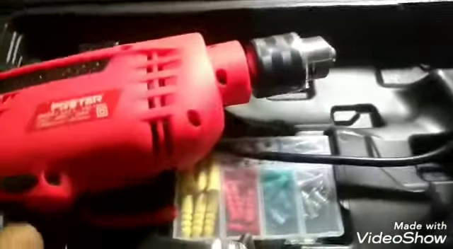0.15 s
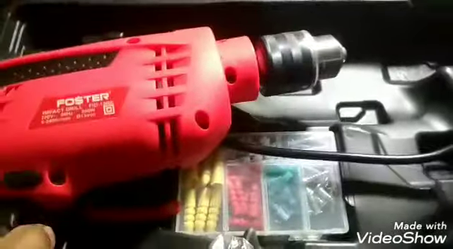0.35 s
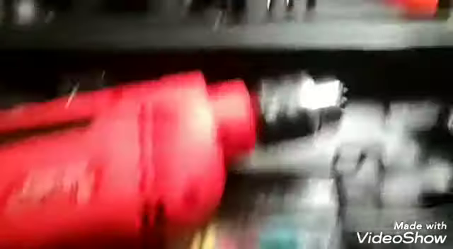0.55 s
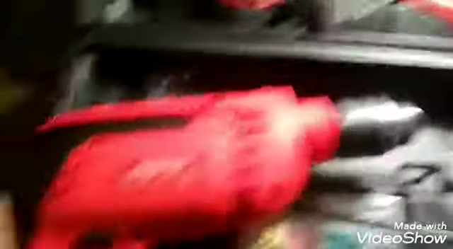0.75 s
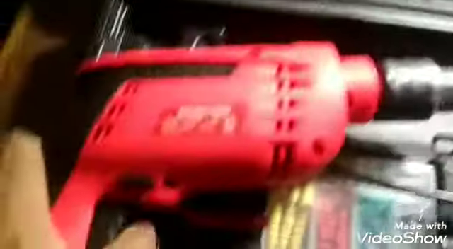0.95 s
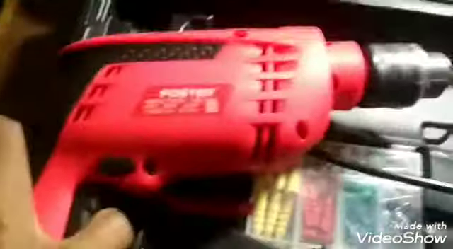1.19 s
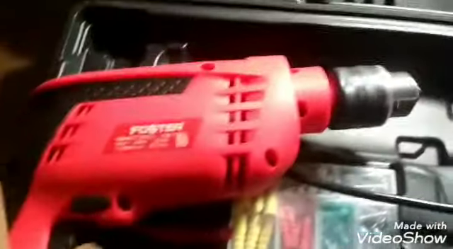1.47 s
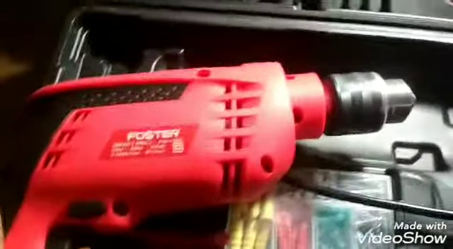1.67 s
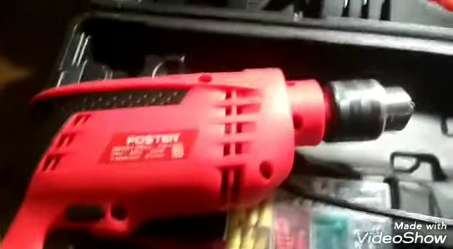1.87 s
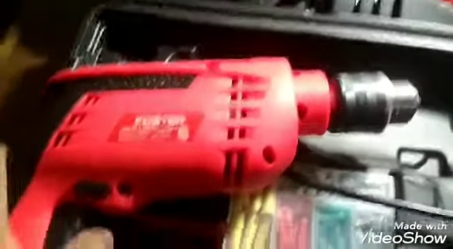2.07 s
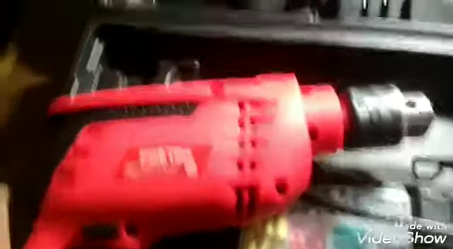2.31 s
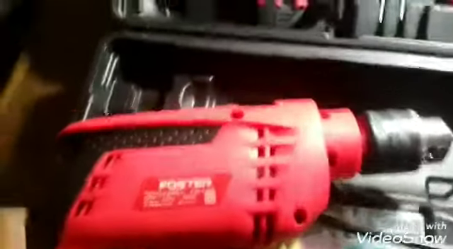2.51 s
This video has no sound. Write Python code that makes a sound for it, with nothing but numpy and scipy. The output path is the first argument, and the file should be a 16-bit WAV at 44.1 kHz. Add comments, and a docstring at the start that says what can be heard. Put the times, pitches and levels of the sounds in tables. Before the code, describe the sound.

Electric drill spun freely in short bursts, whining, rattling and winding down to a stop, close up

```python
"""Close to a phone, on its two microphones: a mains drill with no load, triggered four times in short pulls.
It coasts down between them. Brushes whine on the commutator bars as multiples of the bar rate, the fan hisses
as coloured noise, and loose gears rattle the plastic case as random taps and knocks through resonances.
While current flows the motor hums and growls at twice the mains rate; the case roars at top speed and groans
at the end. Switch ticks and grip creaks come before the start; a faint noise floor lies behind."""
import sys
import numpy as np
from scipy import signal
from scipy.fft import rfft, irfft
from scipy.io import wavfile
from scipy.ndimage import uniform_filter1d

SR = 44100
rng = np.random.default_rng(int(sys.argv[2]) if len(sys.argv) > 2 else 0)


def attenuation_scalar(level_db):
    """Turn a level in dB into a linear amplitude multiplier (20 dB per decade)."""
    decades = np.asarray(level_db, float) / 20
    return 10 ** decades


def pcm_store(signal):
    """Save signal as 16-bit PCM."""
    levels = np.round(np.clip(np.atleast_2d(signal), -1, 1) * 32767)
    wavfile.write(sys.argv[1], SR, levels.astype(np.int16).T)


N = 116865
t = np.arange(N) / SR


def evened(x):
    """Scales x to rms 1."""
    return x / np.sqrt(np.mean(x ** 2) + 1e-20)


def noise():
    """White noise for the whole scene."""
    return rng.standard_normal(N)


def curve(table, col=1):
    """Joins one column over time by straight lines; -120 before the first row."""
    rows = np.array(table)
    return np.interp(t, rows[:, 0], rows[:, col], left=-120)


def read(points, hz):
    """Reads a table of values on a logarithmic frequency axis."""
    f, value = np.transpose(points)
    return np.interp(np.log(hz + 1), np.log(f + 1), value)


def colour(x, points):
    """Filters x by a spectrum in dB."""
    return irfft(rfft(x) * attenuation_scalar(read(points, np.fft.rfftfreq(N, 1 / SR))), N)


def drift(hz):
    """Random wander of rms 1, low-passed at hz."""
    return evened(signal.sosfilt(signal.butter(2, hz, fs=SR, output="sos"), noise()))


def resonate(x, hz, width):
    """A resonance of gain 1 that follows the curve hz."""
    turn = np.exp(2j * np.pi * np.cumsum(hz * np.ones(N)) / SR)
    r = np.exp(-np.pi * width / SR)
    return 2 * (turn * signal.lfilter([1 - r], [1, -r], x / turn)).real


def band(x, lo_hz, hi_hz):
    """Keeps one band of x."""
    return signal.sosfilt(signal.butter(3, [lo_hz, hi_hz], "bandpass", fs=SR, output="sos"), x)


def clicks(rows):
    """Single-sample impulses from rows of time and level."""
    out = np.zeros(N)
    for s, db in rows:
        out[round(s * SR)] += attenuation_scalar(db)
    return out


# Trigger pulls: on [t/s], off [t/s], hum [level/dB], growl [level/dB]
PULLS = [(0.223, 0.415, -47, -34.5), (1.194, 1.335, -44.5, -35), (1.538, 1.649, -45.5, -35),
         (1.784, 1.899, -43, -30.5)]
PULL_RISE_S, HUM_FALL_S, GROWL_FALL_S = 0.028, 0.021, 0.012


def power(col, fall_s):
    """Gain that rises as current comes on at each pull and dies exponentially after release."""
    gain = np.zeros(N)
    for pull in PULLS:
        rise = np.clip((t - pull[0]) / PULL_RISE_S, 0, 1)
        fall = np.exp(-np.maximum(t - pull[1], 0) / fall_s)
        gain = gain + attenuation_scalar(pull[col]) * rise * fall
    return gain


# Commutator bars passing a brush: [t/s], bar rate [f/Hz]
BAR_RATE = [(.24, 1500), (.28, 3500), (.3, 4350), (.33, 5100), (.365, 5650), (.42, 5800), (.45, 5550),
            (.55, 4690), (.7, 3470), (.85, 2460), (.95, 1860), (1.05, 1340), (1.14, 930), (1.2, 729),
            (1.24, 1290), (1.29, 2050), (1.33, 2240), (1.4, 1900), (1.5, 1400), (1.55, 1240), (1.63, 2060),
            (1.665, 2210), (1.76, 1670), (1.795, 1530), (1.85, 2800), (1.9, 3320), (2.1, 2030), (2.2, 1510),
            (2.3, 1030), (2.4, 640), (2.56, 100)]
# Whine partials: [multiple of the bar rate], relative level before colouring [level/dB]
WHINE = [(1, -5), (2, -13), (3, -4), (4, -4), (5, -7), (6, -9), (7, -11), (8, -14)]
# Vents pass the whine unevenly: [f/Hz], gain [level/dB]
VENTS = [(2200, -25), (3700, -2), (5600, 0), (6600, -7), (8500, -4), (10500, 1.5), (16000, -1)]
WHINE_WIDTH_HZ, WHINE_CLEAN, WHINE_FLICKER_DB = 240, .58, 2  # width of the fuzz, share of clean tone
FIRST_FROM_HZ = 2600  # the lowest multiple fades in above this bar rate
UNDER_POWER_DB = -3.5  # sparking brushes bury the whine while current flows
MESH, MESH_DB, FULL_TORQUE_HZ_PER_S = .535, 0, 16000  # gear tone as a multiple of the bar rate


def whine():
    """Brushes sing slightly fuzzy multiples of the bar rate; a lower gear tone sings while speeding up."""
    hz = uniform_filter1d(curve(BAR_RATE), size=1300)
    on = power(2, HUM_FALL_S)
    on = np.minimum(3 * on / on.max(), 1)

    def tone(k):
        """One flickering multiple, faded out toward 17 kHz."""
        clean = np.sqrt(2) * np.sin(2 * np.pi * (k * np.cumsum(hz) / SR + rng.random()))
        fuzz = evened(resonate(noise(), k * hz, WHINE_WIDTH_HZ))
        blend = WHINE_CLEAN * clean + (1 - WHINE_CLEAN) * fuzz
        return np.clip((17000 - k * hz) / 900, 0, 1) * attenuation_scalar(WHINE_FLICKER_DB * drift(15.5)) * blend

    bars = np.zeros(N)
    for k, db in WHINE:
        fade = np.clip((hz - FIRST_FROM_HZ) / 1400, 0, 1) if k == 1 else 1
        bars = bars + attenuation_scalar(db) * tone(k) * fade
    bars = colour(bars, VENTS) * attenuation_scalar(UNDER_POWER_DB * on)
    speeding_up = uniform_filter1d(np.gradient(hz) * SR, size=900)
    torque = np.clip(speeding_up / FULL_TORQUE_HZ_PER_S, 0, 1)
    mesh = attenuation_scalar(MESH_DB) * torque * np.clip((hz - 3000) / 900, 0, 1) * tone(MESH)
    return bars + mesh


# Drill layers: [t/s], hiss [level/dB], top of the hiss against it [level/dB],
# gear rattle and case drone, both before their trims in gears() [level/dB]
LEVELS = [(0.18, -61, 9, -64, -83), (0.208, -59, -12, -75, -67), (0.22, -43.5, 4, -61, -55),
          (0.24, -41, 6, -40, -48), (0.31, -38.5, 4.5, -28, -43), (0.42, -36, 0.5, -34, -61),
          (0.94, -40, 0.5, -36.5, -43), (0.97, -39.5, -2, -58, -44), (1.0, -42.5, 0.5, -31.5, -38.5),
          (1.08, -44.5, 5, -37, -45.5), (1.14, -43.5, 7.5, -41.5, -37), (1.19, -46.5, -1.5, -43.5, -49),
          (1.22, -40.5, -0.5, -37.5, -35.5), (1.27, -37.5, -0.5, -37, -61), (1.32, -37.5, -1, -32.5, -40.5),
          (1.34, -39, 0, -38, -46.5), (1.55, -42, 1.5, -35, -40), (1.59, -37, -4.5, -42, -32.5),
          (1.63, -36, -1, -34.5, -50), (1.7, -41.5, 2, -39, -39), (1.86, -37.5, -2, -34, -39.5),
          (1.9, -39, 1.5, -34, -44), (2.01, -37, -2, -36, -48.5), (2.06, -40.5, 1, -46.5, -37.5),
          (2.11, -39, -2.5, -33.5, -60), (2.14, -39.5, -0.5, -53, -39), (2.26, -43, 1.5, -36.5, -42),
          (2.3, -43, 5, -52.5, -35), (2.45, -48.5, -9.5, -48, -39.5), (2.52, -52, -16.5, -52, -49.5),
          (2.57, -67, -8, -73.5, -61), (2.65, -86.5, -9, -100, -83.5)]
# Shared colour of hiss, crackle and whine: [f/Hz], gain [level/dB]
AIR_COLOUR = [(88, -15.5), (150, -10.5), (222, -14.5), (275, -1), (383, -10), (790, -7.5), (1020, -8.5),
              (1450, -4), (2700, -9), (7470, -11), (11000, -4), (14500, -9), (16000, -19)]


def air():
    """Fan hiss, brush crackle and whine share one colour; the top follows its own level."""
    sparks = rng.random(N) < 5000 / SR
    crackle = attenuation_scalar(5.9 * np.minimum(rng.exponential(1, N), 4)) * sparks * noise()
    hiss = (noise() + 0.47 * evened(crackle)) * attenuation_scalar(0.95 * drift(13))
    coloured = colour(evened(hiss) + whine(), AIR_COLOUR)
    low = signal.sosfiltfilt(signal.butter(2, 7000, fs=SR, output="sos"), coloured)
    top = coloured - low
    low = low / band(low, 2390, 6750).std()
    return attenuation_scalar(curve(LEVELS)) * (low + attenuation_scalar(curve(LEVELS, 2)) * evened(top))


# Resonances of the plastic case: [f/Hz], width [f/Hz], relative level before the width gain [level/dB]
CASE = [(810, 6.7, -15), (1368, 65, 1.5), (1469, 59, 2), (1821, 9.3, -10.5), (2296, 19, -9.5)]


def ring_case(x):
    """Rings the case; narrow resonances get more gain."""
    return sum(attenuation_scalar(db) * resonate(x, f, width) * np.sqrt(90 / width) for f, width, db in CASE)


DRONE_HZ, DRONE_WIDTH_HZ, DRONE_WANDER_HZ = 281.3, 21, 20
TAPS_PER_S, TAP_SPREAD_DB, JUDDER_DB = 1200, 4, 1.5


def gears():
    """Uneven taps of loose gears ring the case as a rattle; with noise they make the grip drone low."""
    taps = attenuation_scalar(TAP_SPREAD_DB * np.minimum(rng.exponential(1, N), 3)) * (rng.random(N) < TAPS_PER_S / SR)
    taps = taps * rng.choice([-1., 1.], N)
    taps = taps * attenuation_scalar(0.95 * drift(34) + JUDDER_DB * drift(110))
    rattle = attenuation_scalar(curve(LEVELS, 3) - 1.0) * evened(ring_case(taps))
    drone = resonate(evened(taps) + noise(), DRONE_HZ, 4.1 * DRONE_WIDTH_HZ)
    drone = resonate(drone, DRONE_HZ + DRONE_WANDER_HZ * drift(16), DRONE_WIDTH_HZ)
    return rattle + attenuation_scalar(curve(LEVELS, 4) - 4.5) * evened(drone)


# Harder gear knocks: [t/s], relative level [level/dB]
KNOCKS = [(0.295, -16), (0.305, -16.5), (0.322, -9.5), (0.342, -13.5), (0.363, -11.5), (0.803, -12.5),
          (0.883, -16.5), (1.219, -17), (1.275, -15), (1.407, -23), (1.597, -11.5), (1.624, -20.5),
          (1.731, -17.5), (1.796, -15), (1.816, -12), (1.839, -12.5), (1.864, -26), (1.967, -17.5),
          (2.003, -12.5), (2.104, -25)]


def gear_knocks():
    """Short noise bursts, heard through the case resonances and a little directly."""
    burst = rng.standard_normal(300) * attenuation_scalar(-60 * np.arange(300) / SR / 0.0088)  # T60 of 8.8 ms
    knocks = signal.oaconvolve(clicks(KNOCKS), burst)[:N]
    return attenuation_scalar(10) * ring_case(knocks) + attenuation_scalar(-12.5) * knocks


# The case roars while the motor is at its fastest: [t/s], [level/dB]
ROAR = [(0.2, -57), (0.242, -44.5), (0.348, -26), (0.352, -31), (0.538, -36.5), (0.566, -51), (0.632, -37),
        (0.648, -41.5), (0.8, -60)]
# Colour of the roar: [f/Hz], gain [level/dB]
ROAR_COLOUR = [(180, -32), (300, -19), (521, -6), (593, -6), (674, 0), (744, -5.5), (894, 1.5), (1040, -8),
               (1300, -10), (1690, -41), (2860, -120)]


def roar(shake):
    """The motor's shaking and uneven noise, coloured by the case."""
    mixed = 0.86 * evened(shake) + noise() * attenuation_scalar(2.2 * drift(68))
    fading = list(ROAR) + [(ROAR[-1][0] + 0.78, -80)]
    return evened(colour(mixed, ROAR_COLOUR)) * attenuation_scalar(curve(fading))


# Colour of the growl: [f/Hz], gain [level/dB]
GROWL = [(120, -50), (200, -30.5), (399, 0), (628, -13.5), (815, -17.5), (913, 2.5), (1050, -10),
         (1390, 0.5), (1660, -9.5), (3000, -15.5), (3900, -53), (6600, -120)]
# Resonances in the growl: [f/Hz], width [f/Hz], relative level [level/dB]
GROWL_RINGS = [(384, 56, -2), (715, 29, 13), (874, 21, -28.5), (1500, 120, 8), (1720, 53, -3),
               (2080, 240, 12)]
MAINS_HZ, BUZZ_DEPTH, BEAT_SPREAD_DB = 50.12, 1.16, -3.5


def motor():
    """Torque beats at twice the mains rate: a hum, and uneven blows shaken through the case."""
    turns = 2 * MAINS_HZ * t
    hum = np.sin(2 * np.pi * turns) + attenuation_scalar(-8.5) * np.sin(4 * np.pi * turns + 1.3)
    hum = hum * attenuation_scalar(0.83 * drift(14))
    blows = attenuation_scalar(BEAT_SPREAD_DB * noise())[turns.astype(int)]  # one random strength per beat
    pulses = np.exp(-BUZZ_DEPTH * np.cos(2 * np.pi * turns))
    shake = noise() * pulses * uniform_filter1d(blows, size=80)
    rings = sum(attenuation_scalar(db) * evened(resonate(shake, f, width)) for f, width, db in GROWL_RINGS)
    growl = evened(evened(colour(shake, GROWL)) + 0.37 * evened(rings))
    hum = power(2, HUM_FALL_S) * np.sqrt(2) * hum
    return hum + power(3, GROWL_FALL_S) * growl + roar(shake)


# The case groans as the gears stall: [t/s], [level/dB]
GROAN = [(2.38, -49), (2.404, -53), (2.528, -55), (2.578, -65), (2.62, -101)]


def groan():
    """Noise through three low resonances of the case at the very end."""
    x = noise()
    rings = resonate(x, 420, 29) + resonate(x, 480, 30) + resonate(x, 777, 50)
    return attenuation_scalar(curve(GROAN)) * (t < GROAN[-1][0]) * evened(rings)


# Switch ticks: [t/s], relative level [level/dB]
SWITCH_TICKS = [(.0423, -56), (.0527, -50.5), (.077, -59), (.098, -64), (.1535, -59), (.1695, -40),
                (.1735, -32)]
# Grip creaks: [t/s], relative level [level/dB]
GRIP_CREAKS = [(0.081, -61.5), (0.153, -59)]
TICK_T60_S, TICK_TAIL_DB, TICK_TAIL_T60_S = 0.0078, -15.5, 0.16


def hand():
    """Switch ticks and grip creaks before the start: decaying noise, bright and low-mid."""
    u = np.arange(9000) / SR
    decay = attenuation_scalar(-60 * u / TICK_T60_S) + attenuation_scalar(TICK_TAIL_DB - 60 * u / TICK_TAIL_T60_S)
    snap = rng.standard_normal(9000) * decay
    creak = rng.standard_normal(9000) * attenuation_scalar(-60 * u / 0.17)
    ticks = band(signal.oaconvolve(clicks(SWITCH_TICKS), snap)[:N], 2360, 12000)
    creaks = band(signal.oaconvolve(clicks(GRIP_CREAKS), creak)[:N], 400, 1100)
    return attenuation_scalar(-2.5) * ticks + attenuation_scalar(11) * creaks


# Colour of the rumble: [f/Hz], gain [level/dB]
RUMBLE = [(18, -57), (30, -28), (43, -35), (92, 13), (118, 2.5), (150, 11.5), (217, -21), (230, -24),
          (300, -38), (510, -120)]
RUMBLE_DB = -18  # against the hiss level, before the wander


def rumble():
    """Wandering low noise that follows the hiss level."""
    low = attenuation_scalar(RUMBLE_DB) * evened(colour(noise(), RUMBLE))
    return attenuation_scalar(curve(LEVELS)) * low * attenuation_scalar(5.4 * drift(6.2))


# Colour of the noise floor: [f/Hz], gain [level/dB]
FLOOR = [(12, -34.5), (20, 4), (103, -10), (457, -43), (753, -32), (1270, -42), (5090, -42.5), (15000, -56)]
FLOOR_DB = -69


def noise_floor():
    """Steady coloured noise, independent at each microphone."""
    return np.array([attenuation_scalar(FLOOR_DB) * evened(colour(noise(), FLOOR)) for _ in range(2)])


# Balance of the microphones: [f/Hz], left minus right [level/dB]
LEAN = [(60, -0.5), (99, 11.5), (160, -2), (270, 4), (450, 1.5), (740, 2.5), (1220, 0.5), (2010, -1),
        (3330, 12.5), (5500, 8), (9080, -5.5), (15000, -3.5)]
# Direct sound at the microphones: [f/Hz], [share 0-1]
DIRECT = [(60, 0.92), (400, 1), (1000, 0.87), (2500, 0.28), (6000, 0.057), (15000, 0.094)]
LAG_S, SCATTER_TURNS = .00018, 0.41  # the left hears later; phase scatter of the reflections


def scene():
    """Two microphones: a direct share that reaches the right first, and reflections that shift as the drill moves."""
    drill = air() + gears() + gear_knocks() + rumble() + motor() + groan()
    hz, _, sources = signal.stft([drill, hand()], SR, nperseg=512, noverlap=384)
    wander = uniform_filter1d(rng.standard_normal(sources.shape), size=3, axis=1)
    wander = uniform_filter1d(wander, size=24, axis=2)
    share = np.clip(read(DIRECT, hz), 0, 1)[:, None]
    side = np.array([1, -1])[:, None, None]  # left, right
    direct = np.exp(-1j * np.pi * side * hz[:, None] * LAG_S)
    reflected = np.sqrt(1 - share ** 2) * attenuation_scalar(2.5) * np.exp(2j * np.pi * SCATTER_TURNS * evened(wander))
    ports = share * direct + reflected
    both = sources[0] * ports + sources[1] * direct  # the hand is heard only directly
    both = both * attenuation_scalar(side * read(LEAN, hz)[:, None] / 2)
    heard = signal.istft(both, SR, nperseg=512, noverlap=384)[1]
    return attenuation_scalar(1.0) * heard[:, :N] + noise_floor()


def low_pass(x):
    """Removes everything above the highest recorded frequency."""
    return signal.sosfilt(signal.butter(12, 15500, fs=SR, output="sos"), x)


def record(dry):
    """The microphone drops the deepest bass, below 55 Hz."""
    thin = signal.sosfilt(signal.butter(2, 55, "high", fs=SR, output="sos"), dry)
    return low_pass(thin)


dry = scene()
out = record(dry)
pcm_store(out)
```